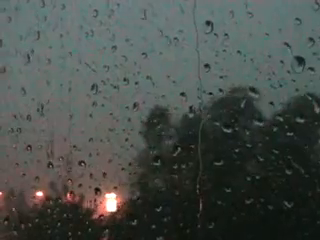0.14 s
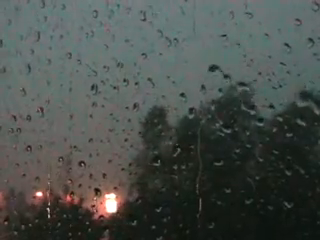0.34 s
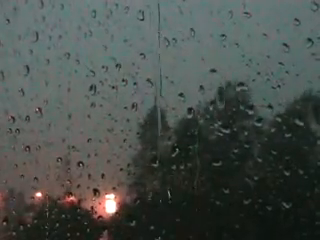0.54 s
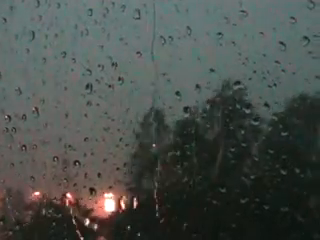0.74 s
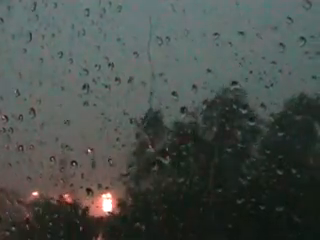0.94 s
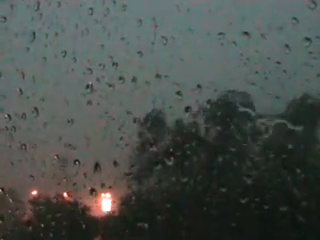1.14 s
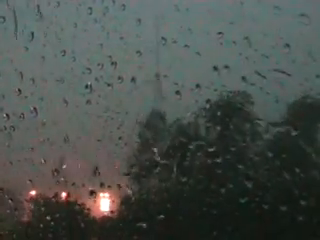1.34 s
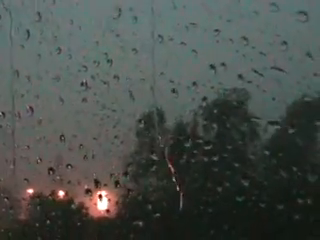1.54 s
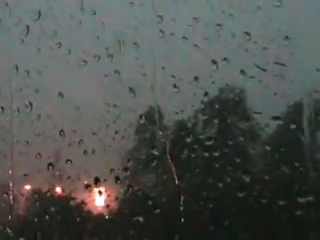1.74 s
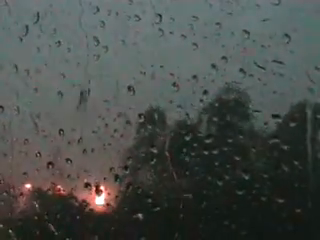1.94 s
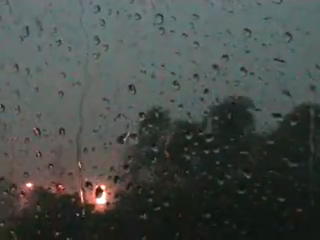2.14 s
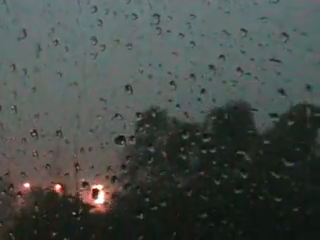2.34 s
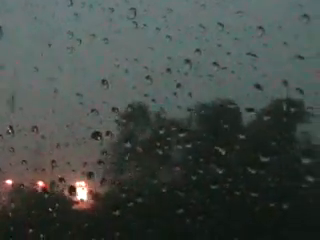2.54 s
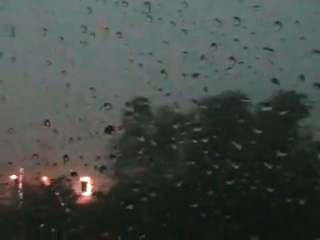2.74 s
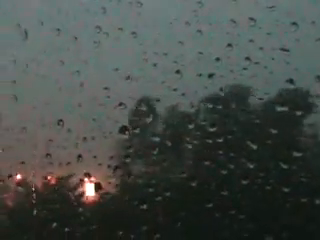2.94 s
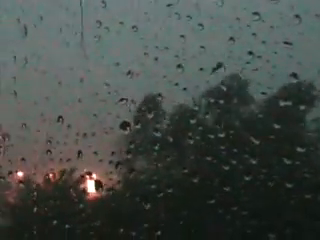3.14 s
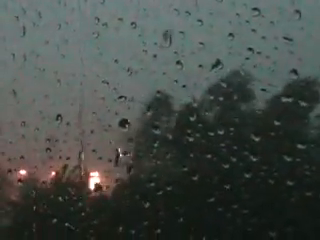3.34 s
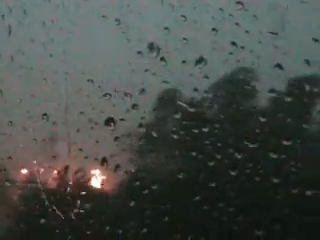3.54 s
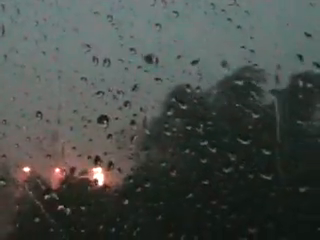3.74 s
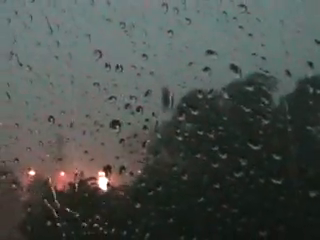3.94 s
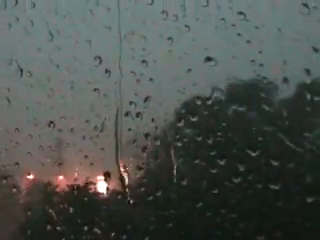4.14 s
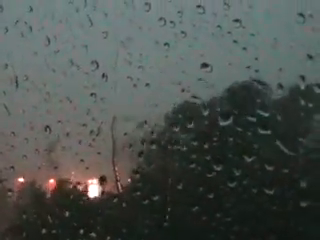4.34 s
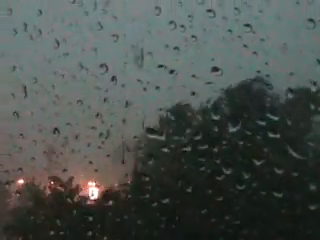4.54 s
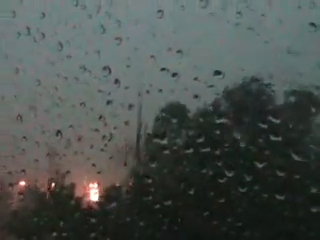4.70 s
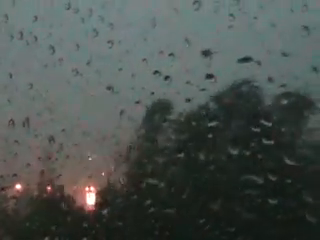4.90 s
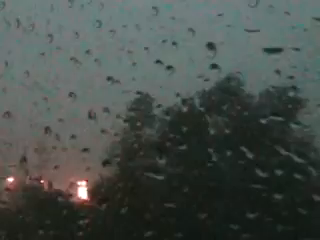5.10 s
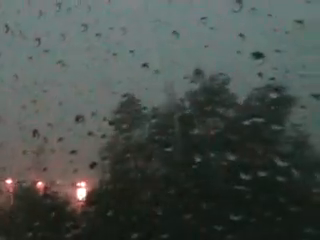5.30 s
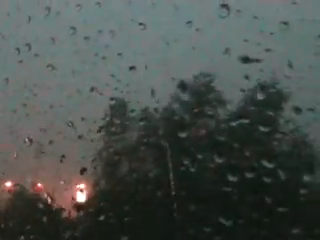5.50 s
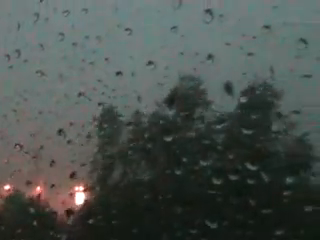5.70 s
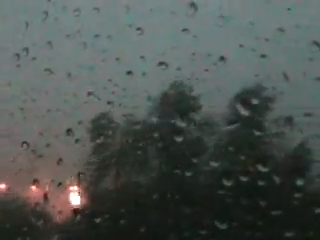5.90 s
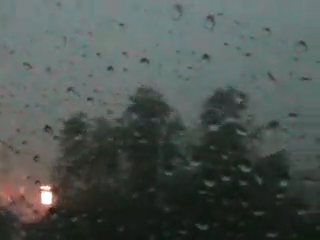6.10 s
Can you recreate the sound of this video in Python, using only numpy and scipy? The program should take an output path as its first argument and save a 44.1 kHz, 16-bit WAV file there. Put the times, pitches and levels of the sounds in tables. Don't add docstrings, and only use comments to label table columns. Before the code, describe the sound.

A small room close behind a window in a gale, captured in stereo by a camera with faint hiss and a thin high motor whine. From 0 s, wind roars through the walls as a steady, boomy low rush with a faint wavering howl and rumbling frame. Rain drums densely on the glass with fine spray hiss, fluttering quickly. Sheets swell near 0.8 and more strongly at 1.2 s, then keep surging mildly to 4 s, with sparse light drop ticks, a few around 3 s. From 4.8 s the rain thickens, peaking near 5.1 s with crisp fat drops smacking and splashing until 5.5 s. A soft dull sash knock comes at about 5.55 s. The frame shudders near 6 s; from 6.1 s the strongest gust rises, and at 6.2 s fat drops crack on the pane as the sash bangs loudly with a lower rebound, ending abruptly.

```python
import sys
import numpy as np
from scipy import signal
from scipy.fft import rfft, irfft, next_fast_len
from scipy.io import wavfile
from scipy.ndimage import uniform_filter1d, map_coordinates

SR = 44100
rng = np.random.default_rng(int(sys.argv[2]) if len(sys.argv) > 2 else 0)


def voltage_ratio(level):
    return 10 ** (np.asarray(level, float) / 20)


def wav_record(signal):
    frames = np.transpose(np.atleast_2d(signal))
    bounded = np.clip(frames, -1, 1)
    quanta = np.round(bounded * 32767).astype(np.int16)
    wavfile.write(sys.argv[1], SR, quanta)


N = 276056

# pitch in Hz, level in dB per Hz.
CAPSULE_HISS = [(5000, -29), (7500, -8), (9500, -20), (10500, 19), (12300, -5)]
# multiple of its turning rate, level in dB rms.
MOTOR_WHINE = [(17, -76), (18, -76), (32, -79), (33, -79), (34, -74), (35, -79), (36, -80), (37, -91),
               (38, -88), (39, -93), (40, -90)]
MOTOR_HZ = 300

# time in seconds, strength in dB.
WIND_STRENGTH = [(0, -30), (.8, -29), (1.0, -30.5), (1.17, -28), (1.62, -30.5), (2.4, -31), (2.52, -28.5),
                 (3.0, -27.5), (3.9, -28.5), (4.35, -31.5), (4.74, -29.5), (5.5, -28.5), (5.7, -32),
                 (5.85, -27), (6.05, -30), (6.14, -25.5), (6.21, -20), (6.26, -21.5)]
CALM_DB = -29
# pitch in Hz, level in dB per Hz.
ROAR = [(60, -35), (110, -21), (140, -8.5), (300, -3.5), (560, -4.5), (800, -4), (1100, -7.5),
        (1500, -14.5), (2200, -25)]
# pitch in Hz, width in Hz, boost in dB.
ROOM_MODES = [(55, 10, 1), (76.5, 8, 13.5), (124.6, 15, 6), (136, 6.4, -5), (161.6, 22, 7.5),
              (182, 11, -13), (199, 10.5, 6.5), (246, 10.4, 4.5), (280.8, 5.6, 8), (443.4, 15, 4.5),
              (416, 8.8, 3.5), (563, 37, 7), (679, 11, 7.5)]
# pitch in Hz, level in dB per Hz.
FRAME_RUMBLE = [(8, -15), (25, -10), (42, -1.5), (56, 2), (72, -5.5), (90, -7), (115, 5.5), (170, -20)]
# peak in seconds, surge in dB, length in seconds.
SHOVES = [
    (.82, 0, .15),
    (1.62, 0, .2),
    (2.28, 0, .15),
    (2.7, 1, .5),
    (4.6, 4.5, 0.38),
    (5.3, 4.5, 0.74),
    (5.97, 12, 0.17),
    (6.26, -3, 0.059),
]
# start in seconds, peak in dB, ring in Hz.
SASH_KNOCKS = [
    (5.553, -17, 700),
    (6.209, 1, 770),
    (6.2285, -5, 550),
]

# peak in seconds, surge in dB, length in seconds.
RAIN_SHEETS = [(.12, -1.5, 0.055), (.36, -1, 0.18), (.8, 4.5, 0.13), (1.01, 1.5, 0.034), (1.09, 2, 0.026),
               (1.21, 8.5, 0.11), (1.4, 4, 0.13), (1.53, 4, 0.057), (1.8, 5, 0.19), (1.99, 3, 0.13),
               (2.3, 3, 0.21), (2.75, 2.5, 0.082), (3.05, 5, 0.15), (3.22, 3, 0.092), (3.6, 3, 0.11),
               (4.45, 2, 0.43), (4.84, 4, 0.064), (4.9, 6.5, 0.071), (5.08, 11.5, 0.13), (5.28, 8, 0.097),
               (5.43, 5.5, 0.17), (5.58, 8.5, 0.14), (5.79, 5.5, 0.074), (5.92, 6, 0.059),
               (6.05, -2.5, .025), (6.11, -1.5, 0.022), (6.13, 10.5, 0.28), (6.185, 1, .02),
               (6.222, 1.5, 0.012), (6.255, -1.5, .012)]
# pitch in Hz, level in dB per Hz.
PANE_DRUM = [(700, -43), (1100, -4), (1500, -4), (2200, -1), (2800, -5.5), (3700, -9.5), (4800, -20.5),
             (6500, -26)]
# pitch in Hz, level in dB per Hz.
SPRAY = [(2500, -19), (3800, -4), (4700, -5), (5700, -6.5), (6900, -4.5), (8300, -10.5), (9600, -16.5),
         (10500, -29), (12500, -14)]
# start in seconds, peak in dB, ring in Hz, splash length in milliseconds.
FAT_DROPS = [(.699, -32, 7500, 3), (1.2825, -35, 4000, 5.3), (1.6057, -30, 4000, 1.1),
             (2.6856, -36, 2390, 6.1), (2.811, -34, 7800, 2.5), (2.832, -31, 4600, 3.2),
             (2.9826, -30, 4500, 4), (3.044, -27, 2900, 2.5), (3.5113, -33.5, 3720, 9.9),
             (3.8036, -34, 4530, 4.2), (4.827, -31, 4300, 5.7), (4.851, -24.5, 5960, 5),
             (4.869, -37, 6300, 1.4), (4.911, -31, 6350, 2.1), (4.9484, -24, 4800, 3.5),
             (5.123, -17.5, 5630, 6), (5.129, -19, 5000, 4.1), (5.2377, -27, 3800, 3.2),
             (5.2708, -27, 3800, 3.7), (5.3198, -21, 4000, 3.5), (5.391, -23, 3800, 4.3),
             (5.392, -34, 7000, 4), (5.413, -31, 5500, 3.2), (5.494, -31, 7000, 5.7),
             (5.532, -22, 5170, 1.4), (5.8957, -21.5, 10100, 0.77), (5.894, -21, 6500, 4),
             (6.118, -15.5, 4000, 0.54), (6.12, -24, 3000, 2), (6.2063, -9, 7800, 2.2),
             (6.2072, -7.5, 5240, 1.8), (6.2105, -18, 2800, 1.5), (.351, -37, 5500, 4),
             (.4648, -43, 4500, 2), (.5, -35, 6000, 3), (.9123, -34, 3500, 2), (.9527, -34, 4000, 1),
             (1.4032, -28.5, 3500, 3), (3.3076, -29.5, 3500, 3), (3.6272, -36, 3500, 2.7),
             (4.0507, -36, 5000, 2), (4.2367, -38, 3500, 4), (4.347, -35, 6500, 4), (4.411, -30, 3500, 2),
             (4.448, -32, 4500, 1.8), (5.029, -26, 3500, 3), (5.5787, -29, 3160, 3), (5.715, -32, 6000, 8),
             (6.212, -22, 8000, 5.4), (6.2405, -22, 3300, 1.2)]
# pitch in Hz, level in dB per Hz.
DROP_TICK = [(2000, -26), (3000, 1), (5000, -0.5), (6200, -4.5), (7500, -2.5), (9300, -4), (11000, -10),
             (12300, -40)]
# pitch in Hz, level in dB per Hz.
DROP_THUD = [(300, -49), (700, 7), (1300, -16), (2300, 4), (3100, -5), (4500, -56)]

# pitch in Hz, side minus mid in dB.
STEREO_WIDTH = [(60, 1), (96, 9.5), (150, -5), (250, -7.5), (390, -11), (630, -14), (1010, -11.5),
                (1620, -15), (2590, -10.5), (4150, -10), (6650, -9.5), (10600, 3)]
# pitch in Hz, share from 0 to 1.
ARRIVAL_LAG = [(30, 1), (250, 0.84), (600, 0.39), (1200, .33), (8000, .32), (10000, .2)]
# pitch in Hz, left minus right in dB.
CAPSULE_LEAN = [(60, -.6), (130, -.2), (300, -1), (1100, -.4), (2300, -1.6), (5000, -.5), (10000, 1.2)]


def unit(x):
    return x / np.sqrt(np.mean(x ** 2) + 1e-20)


def along(points, hz):
    f, value = np.transpose(points)
    return np.interp(np.log(hz + 1), np.log(f + 1), value)


def wobble(rate):
    knots = rng.standard_normal(int(N * rate / SR) + 4)
    return map_coordinates(knots, [np.arange(N) * rate / SR])


def filtered(x, response):
    m = next_fast_len(N + 8192)
    hz = np.fft.rfftfreq(m, 1 / SR)
    return irfft(rfft(x, m) * response(hz), m)[..., :N]


def shade(spectrum):
    lowest, highest = spectrum[0][0], spectrum[-1][0]
    return lambda hz: voltage_ratio(along(spectrum, hz)) * (hz > lowest) * (hz < highest)


def patchy(x, depth_db):
    z = signal.stft(x, nperseg=512)[2]
    field = uniform_filter1d(rng.standard_normal(z.shape[1:]), size=6, axis=0)
    field = uniform_filter1d(field, size=10, axis=1)
    return signal.istft(z * voltage_ratio(depth_db * unit(field)), nperseg=512)[1][:, :N]


def surges(rows):
    t = np.arange(N) / SR
    return sum(db * np.exp(-((t - s) / length) ** 2) for s, db, length in rows)


def gust(calm_db, in_wind, surge_db):
    s, db = np.transpose(WIND_STRENGTH)
    wind_db = np.interp(np.arange(N) / SR, s, db)
    return voltage_ratio(calm_db + in_wind * (wind_db - CALM_DB) + surge_db)


def capsule_hiss():
    noise = patchy(rng.standard_normal((2, N)), depth_db=2)
    hiss = unit(filtered(noise, shade(CAPSULE_HISS)))
    return voltage_ratio(-62.0) * (hiss - 0.21 * hiss[::-1])


def motor_whine():
    t = np.arange(N) / SR
    whine = np.zeros(N)
    for multiple, db in MOTOR_WHINE:
        tone = np.sin(2 * np.pi * (multiple * MOTOR_HZ * t + rng.random()))
        whine += voltage_ratio(db - 3 + 3 * wobble(2)) * tone
    return whine


def howl():
    hz = 157 + 4 * (wobble(3) + 0.555 * wobble(14))
    level = gust(calm_db=-43, in_wind=1.3, surge_db=1.5 * wobble(4.7))
    return level * np.sin(2 * np.pi * np.cumsum(hz) / SR)


def room_gain(f):
    gain = 1
    for centre, width, db in ROOM_MODES:
        gain = gain + (voltage_ratio(db) - 1) / (1 + (2 * (f - centre) / width) ** 2)
    return 0.029 + np.abs(gain)


def wind(flutter):
    turbulence = patchy(rng.standard_normal((2, N)), depth_db=0.98)
    drift = 0.021
    low = filtered(turbulence, lambda f: shade(ROAR)(f) * room_gain(f * (1 + drift * (f > 220))))
    high = filtered(turbulence, lambda f: shade(ROAR)(f) * room_gain(f * (1 - drift * (f > 220))))
    flexed = .5 + .5 * np.tanh(2 * wobble(3.12))
    air = flexed * high + (1 - flexed) * low
    roar_level = gust(CALM_DB, in_wind=0.95, surge_db=0.31 * surges(RAIN_SHEETS))
    roar = roar_level * unit(air * voltage_ratio(0.5 * flutter))
    shake = filtered(rng.standard_normal((2, N)), lambda f: shade(FRAME_RUMBLE)(f) * room_gain(f))
    return roar + gust(calm_db=-51, in_wind=.1, surge_db=surges(SHOVES)) * unit(shake)


def sash_knocks():
    t = np.arange(SR // 20) / SR
    out = np.zeros(N + SR)
    fade_s = 0.009
    for s, db, ring_hz in SASH_KNOCKS:
        start = round(s * SR)
        out[start:start + len(t)] += voltage_ratio(db - 6 - 60 * t / fade_s) * np.sin(2 * np.pi * ring_hz * t)
    return out[:N]


def patter(per_second, spread_db, share):
    lands = rng.random(N) < per_second / SR
    size = voltage_ratio(spread_db * np.minimum(rng.exponential(size=N), 4))
    hits = uniform_filter1d(lands * size, size=24)
    return rng.standard_normal((2, N)) * np.sqrt(1 - share + share * unit(hits) ** 2)


def pane_gain(f):
    ring_hz, ring_width_hz, ring_db = 2250, 130, 1.5
    return shade(PANE_DRUM)(f) * voltage_ratio(ring_db / (1 + (2 * (f - ring_hz) / ring_width_hz) ** 2))


def rain(flutter):
    sheets = surges(RAIN_SHEETS)
    impacts = patter(per_second=770, spread_db=8.0, share=0.095)
    drum = filtered(patchy(impacts, depth_db=1.02), pane_gain)
    drum = gust(calm_db=-43, in_wind=0.76, surge_db=1.07 * sheets) * unit(drum * voltage_ratio(0.57 * flutter))
    droplets = patter(per_second=600, spread_db=2.5, share=0.11)
    spray = filtered(patchy(droplets, depth_db=1.5), shade(SPRAY))
    spray = gust(calm_db=-52.5, in_wind=0.76, surge_db=0.89 * sheets) * unit(spray * voltage_ratio(0.8 * flutter))
    return drum + spray


def fat_drops():
    t = np.arange(SR // 10) / SR
    hz = np.fft.rfftfreq(2 * len(t), 1 / SR)
    out = np.zeros(N + SR)
    for s, db, ring_hz, ms in FAT_DROPS:
        shape = np.exp(-(1000 * t / ms) ** 2) + voltage_ratio(-8 - 60 * t / 0.1)
        rise = 1 - np.exp(-1000 * t / (0.22 * ms + .01))
        burst = rng.standard_normal(len(t)) * shape * rise
        burst *= .8 * np.linalg.norm(shape[:200]) / np.linalg.norm(burst[:200])
        burst[30] += 6 / ms
        ring = .14 + 1 / (1 + ((hz - ring_hz) / 2200) ** 4)
        thud_db = 4 - 15.5 * np.log2(ring_hz / 4000)
        colour = shade(DROP_TICK)(hz) * ring + voltage_ratio(thud_db) * shade(DROP_THUD)(hz)
        sound = np.roll(irfft(rfft(burst, 2 * len(t)) * colour), len(t) // 2)
        start = round(s * SR) - len(t) // 2
        out[start:start + 2 * len(t)] += voltage_ratio(db - 1.0) * sound
    return out[:N]


def pair(streams):
    def spread(f):
        lag = np.clip(along(ARRIVAL_LAG, f), 0, 1)
        return voltage_ratio(along(STEREO_WIDTH, f)) * np.array([1j * lag, np.sqrt(1 - lag ** 2)])

    side = filtered(streams, spread).sum(axis=0)
    return np.array([streams[0] + side, streams[0] - side])


def scene():
    flutter = unit(0.3 * wobble(16) + 0.9 * wobble(45))
    storm = pair(wind(flutter) + rain(flutter))
    near = fat_drops()
    echo = np.roll(near, 66)
    side = filtered(echo, lambda f: voltage_ratio(along(STEREO_WIDTH, f) - 2.5))
    return storm + near + [side, -side] + sash_knocks() + howl()


def low_pass(x):
    return signal.sosfilt(signal.butter(12, 12060, fs=SR, output="sos"), x)


def record(dry):
    lean = filtered(dry, lambda f: voltage_ratio(along(CAPSULE_LEAN, f) * np.array([[.5], [-.5]])))
    mix = lean + capsule_hiss() + motor_whine() * voltage_ratio([[1.5], [-1.5]])
    mix = mix + .0013
    return low_pass(mix)


dry = scene()
out = record(dry)
wav_record(out)
```